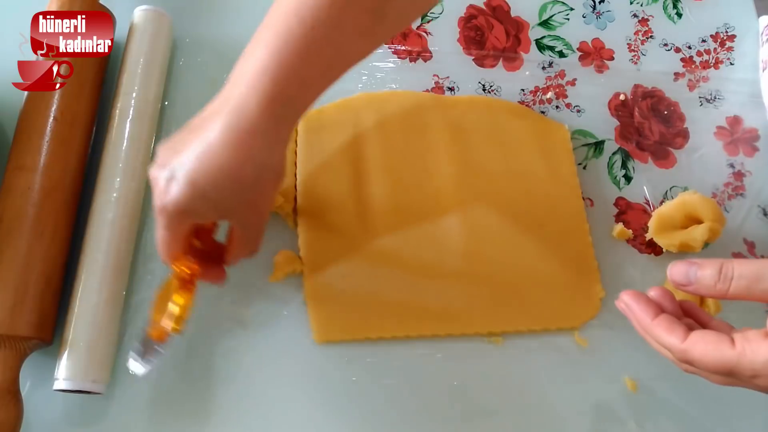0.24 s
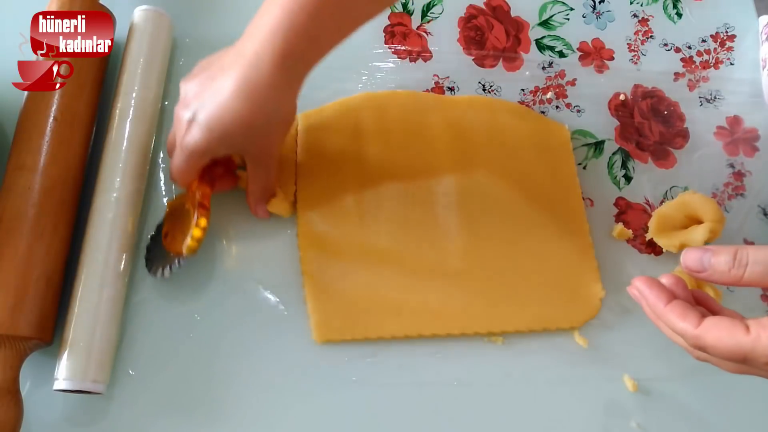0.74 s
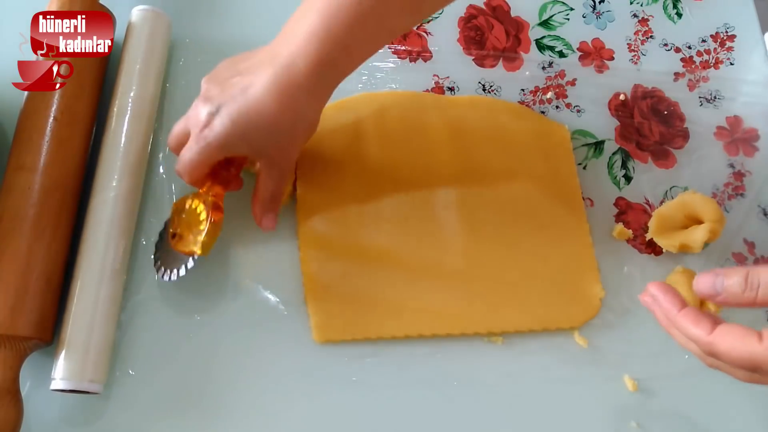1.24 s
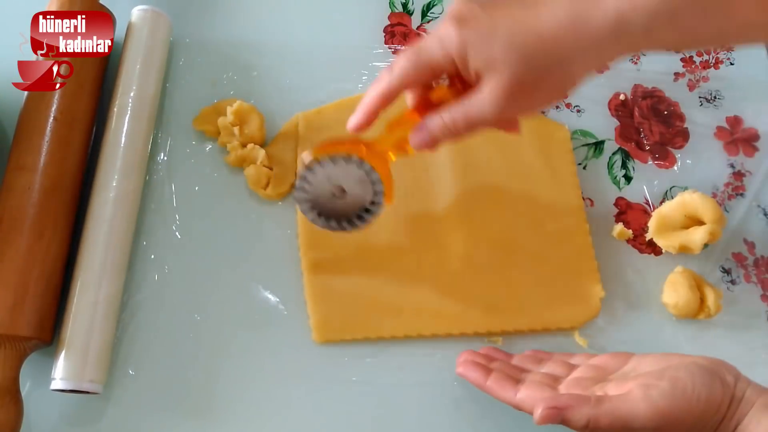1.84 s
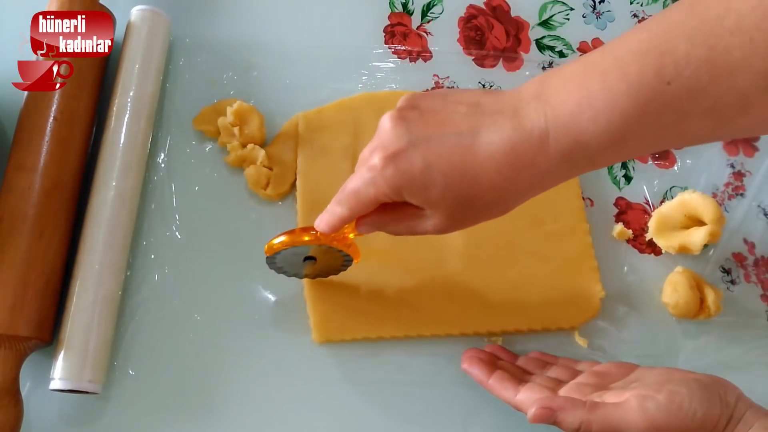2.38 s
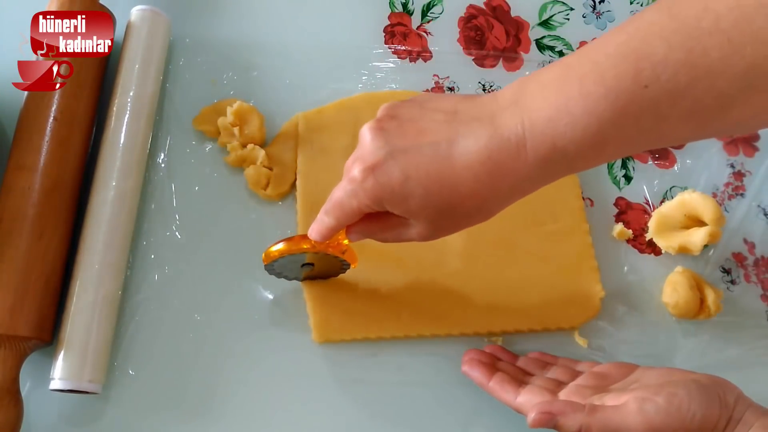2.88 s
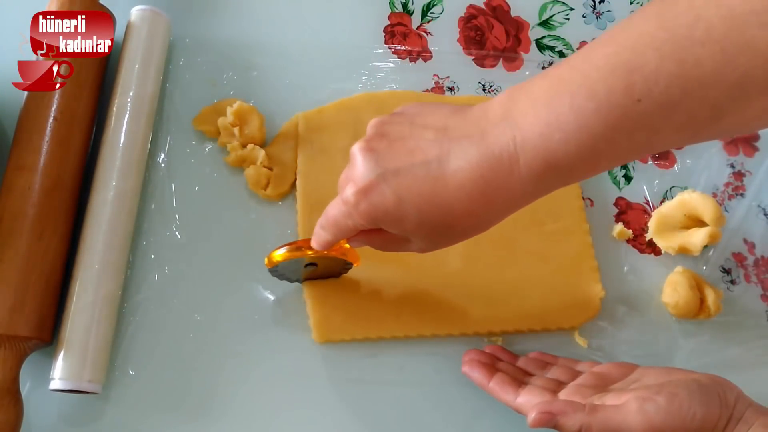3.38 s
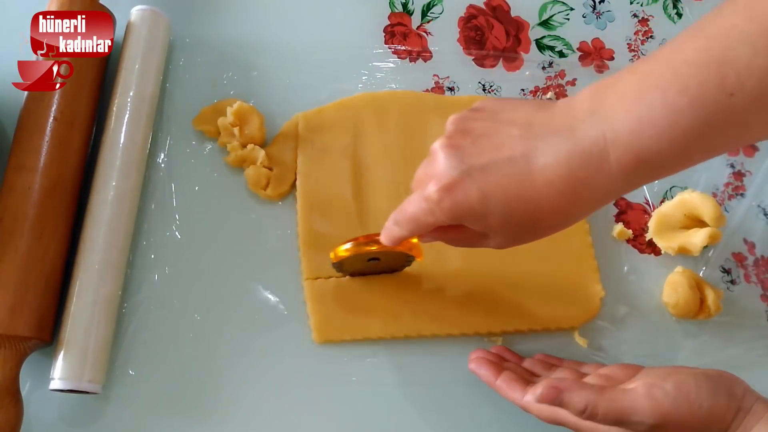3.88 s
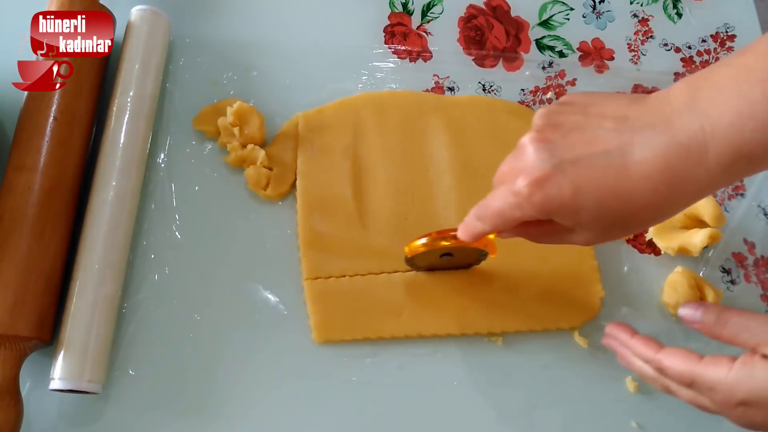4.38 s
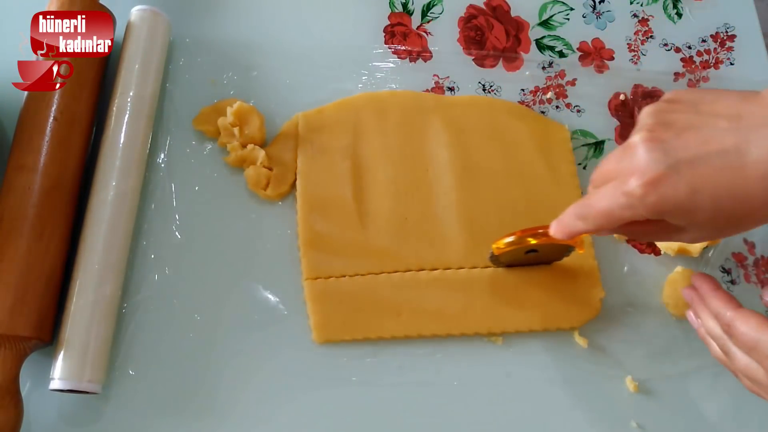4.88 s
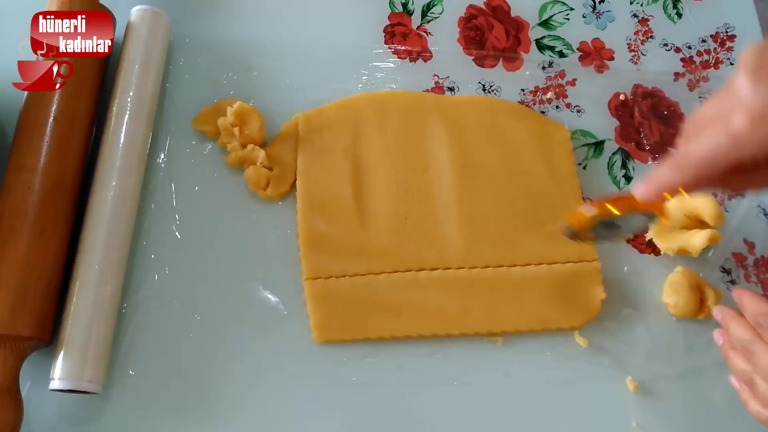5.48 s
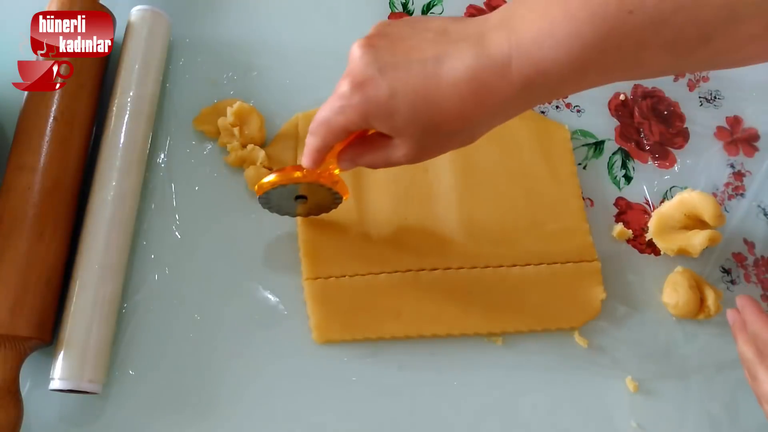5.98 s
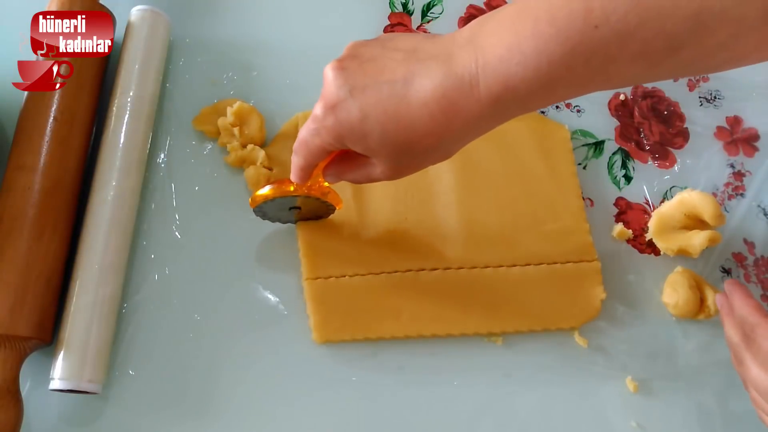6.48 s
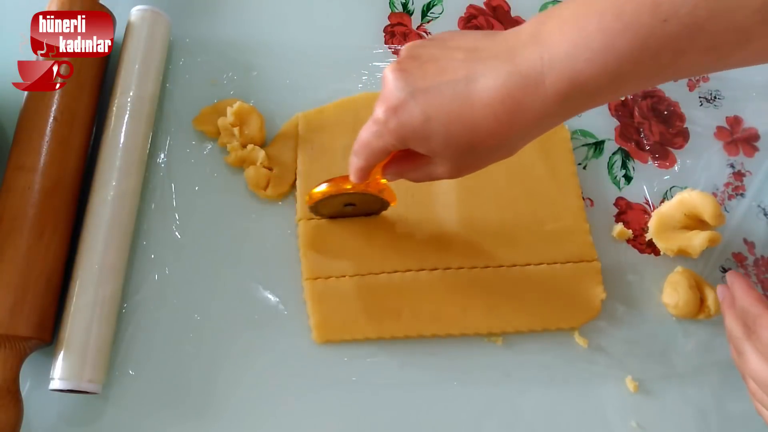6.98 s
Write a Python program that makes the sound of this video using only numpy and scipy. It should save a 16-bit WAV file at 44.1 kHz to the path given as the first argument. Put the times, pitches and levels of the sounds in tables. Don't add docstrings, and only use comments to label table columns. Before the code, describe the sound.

Sharp metallic knocks and ringing rattles on glass, low table thumps, then a soft gritty rolling scrape that swells and stops with a light clink.

```python
import sys
import numpy as np
from scipy import signal
from scipy.fft import rfft, irfft, next_fast_len
from scipy.io import wavfile
from scipy.ndimage import uniform_filter1d, map_coordinates

SR = 44100
rng = np.random.default_rng(int(sys.argv[2]) if len(sys.argv) > 2 else 0)


def makeup_ratio(level_db):
    decades = np.asarray(level_db, float) / 20
    return 10 ** decades


def unload_audio(sound):
    columns = np.transpose(np.atleast_2d(sound))
    steps = np.round(np.clip(columns, -1, 1) * 32767)
    wavfile.write(sys.argv[1], SR, steps.astype(np.int16))


N = 319284
LEFT_RIGHT = np.array([[1], [-1]])


def level(x, db):
    return x * makeup_ratio(db) / np.sqrt(np.mean(x ** 2))


def peak(x, db):
    return x * makeup_ratio(db) / np.abs(x).max()


def band(x, hz, width):
    return signal.lfilter(*signal.iirpeak(min(hz, .45 * SR), hz / width, SR), x)


def double_band(x, hz, width, second_width):
    return band(band(x, hz, width), hz, second_width)


def shape(x, points, share=0.93):
    hz, db = np.transpose(points)
    size = next_fast_len(x.shape[-1])
    f = np.maximum(np.arange(size // 2 + 1) * SR / size, 1)
    gain = makeup_ratio(share * np.interp(np.log(f), np.log(hz), db))
    return irfft(rfft(x, size) * gain, size)[..., :x.shape[-1]]


def curve(rows):
    s, *columns = np.transpose(rows)
    return [np.interp(np.arange(N) / SR, s, c) for c in columns]


def walk(rate):
    k = int(SR / rate)
    steps = np.repeat(rng.standard_normal(N // k + 1), k)
    return 1.2 * uniform_filter1d(uniform_filter1d(steps, k), k)[:N]


def ring(t, hz, t60, phase):
    return np.sin(2 * np.pi * (hz * t + phase)) * np.exp(-np.log(1000) * t / t60)


def add(out, sound, s):
    i = int(s * SR)
    out[i:i + len(sound)] += sound[:N - i]


# pitch_hz, level_db (per Hz)
AIR = [(13, -27), (22, -2.5), (44, -7), (311, -19), (853, -25), (1880, -28), (5460, -33.5), (14000, -33.5)]


def air():
    mid, side = shape(rng.standard_normal((2, N)), AIR)
    side = shape(side, [(60, -2.5), (500, 2.0), (3000, -0.5), (12000, 0)])
    return level(mid + side * LEFT_RIGHT, -66.5) * makeup_ratio(0.27 * walk(3.5) + 1.5 * LEFT_RIGHT)


def loads(rest_db, rows):
    t, power = np.arange(0, N, 50) / SR, makeup_ratio(rest_db[::50]) ** 2
    for s, db, hold in rows:
        landing = 1506.5 * (s - t)
        settling = 159.5 * (t - s - hold)
        power = power + makeup_ratio(db - np.clip(np.maximum(landing, settling), 0, 100)) ** 2
    return np.interp(np.arange(N) / SR, t, 10 * np.log10(power))


# pitch_hz, width_hz
TABLE = [(66, 25), (110, 16), (130, 20), (175, 60), (230, 70), (290, 60), (370, 70), (720, 450)]
# start_s, low_boom_db, upper_boom_db, hold_s
BOOMS = [(0.0, -48, -46.5, 0.022), (0.393, -51.5, -45, 0.11), (0.52, -50, -64, 0.17),
         (0.916, -83, -72, .02), (1.12, -78, -50.5, .04), (1.489, -56, -63, .04), (1.956, -58, -64.5, .04),
         (2.356, -74, -74, 0.033), (2.822, -62, -85, 0.025), (3.167, -67.5, -75, .03),
         (3.525, -64.5, -68, 0.03), (3.703, -80, -71.5, 0.059), (4.09, -62, -66.5, 0.081),
         (4.534, -76, -56.5, 0.017), (5.144, -68, -68, 0.023), (5.431, -58, -58, 0.039),
         (6.567, -72, -70.5, 0.021), (6.937, -77, -61, 0.028), (7.085, -58.5, -62.5, 0.032)]
# start_s, level_db, hold_s
CREAKS = [(0.0, -39, 0.011), (0.385, -72, 0.02), (0.633, -48.5, 0.018), (0.854, -59, 0.023),
          (1.119, -53.5, 0.037), (1.5, -52.5, 0.04), (1.697, -67.5, 0.089), (1.96, -64, 0.017),
          (2.068, -65, 0.34), (3.696, -69, 0.055), (4.096, -70, 0.026), (4.478, -64.5, 0.43),
          (5.167, -72, 0.034), (5.413, -66, 0.24), (6.455, -68.5, 0.4), (7.046, -66, 0.05)]
# time_s, level_db
WEIGHT = [
    (0, -64),
    (1.3, -68),
    (2.1, -72),
    (3.3, -75),
    (3.7, -66),
    (4.9, -68.5),
    (5.3, -74.5),
    (5.6, -68),
    (6.3, -71.5),
    (7.24, -65.5),
]


def table():
    rest_db = curve(WEIGHT)[0] + walk(7.7)
    low_db = loads(rest_db, [(s, db, hold) for s, db, _, hold in BOOMS])
    upper_db = loads(rest_db - 6.5, [(s, db, hold) for s, _, db, hold in BOOMS])
    creak_db = loads(rest_db - 4.5, CREAKS)
    levels_db = [low_db, upper_db - 2.5, upper_db - 1.5, upper_db - 12.0,
                 creak_db - 9.0, creak_db - 13.0, creak_db - 8.0, creak_db - 12.5]
    out = 0
    for (hz, width), db in zip(TABLE, levels_db):
        mid, side = (level(double_band(rng.standard_normal(N), hz, width, 2 * width), 0) for _ in range(2))
        out = out + makeup_ratio(db) * (mid + .28 * side * LEFT_RIGHT)
    return out * makeup_ratio(np.array([[2.5], [-2.8]]))


# pitch_hz, width_hz, level_db
GUARD = [(1900, 1100, -9), (2970, 1700, -10.5), (3280, 1100, -10.5), (4430, 100, 1.5), (4840, 100, -3.5),
         (6030, 4600, -3), (6700, 3000, -10.5), (8050, 2700, -4.5)]
# start_s, peak_db, guard_pitch_hz, bright_crack_db, contact_ms
CLACKS = [(0.0044, -11, 4730, -4.5, 4), (0.0136, -13, 4596, -8.5, 6.3), (0.0321, -11.5, 4500, -1.5, 1.9),
          (1.2891, -25.5, 4650, -23, 1.7), (1.292, -30.5, 3950, -31, 0.91), (1.2975, -35.5, 6700, -26, 1.9),
          (1.299, -43, 4100, -24, 4), (1.5009, -21.5, 4570, -10, 2.4), (1.5048, -7.5, 4840, -11.5, 3.6),
          (1.5075, -15.5, 2950, -24, 2.6), (1.511, -15, 10300, -12.5, 4.6), (1.5095, -11.5, 4600, -7, 1.4),
          (1.7437, -30, 4160, -19, 4.4), (1.7471, -22.5, 4460, -16.5, 8.4), (1.752, -27, 5500, -20.5, 5.8),
          (1.8284, -29, 4880, -12.5, 4), (1.8614, -37, 3075, -24, 3), (1.884, -31.5, 5900, -27, 3.2),
          (1.932, -36.5, 4880, -11.5, 4.4), (1.9786, -9.5, 4900, -13, 2.8), (1.9782, -7.5, 6650, -21, 3.2),
          (1.997, -28.5, 6700, -24.5, 6.5), (2.04, -31.5, 5200, -25, 14), (1.52, -29, 5580, -22, 5.8),
          (1.981, -23, 10500, -14, 4), (1.986, -23, 5900, -22, 4.2), (2.0204, -21.5, 4570, -14.5, 1.1),
          (2.1005, -32, 5400, -38, 3), (5.555, -36, 4760, -18, 4), (5.564, -32.5, 4930, -13, 4.3),
          (5.5715, -24.5, 4940, -13, 1.1), (5.5945, -28, 4800, -21, 1), (5.7681, -29.5, 5300, -15, 1.8),
          (5.787, -43.5, 4500, -29, 8), (5.769, -39, 10600, -27, 1.3), (5.772, -38, 7000, -27, 2.5)]
# start_s, peak_db,
# guard_pitch_hz, table_thud_db, contact_ms
NUDGES = [(0.026, -10, 2906, -8, 3.56), (0.506, -36.5, 4830, -51, 3.4), (0.632, -35, 2720, -1, 4.1),
          (0.687, -33, 4560, 2, 3.8), (0.7668, -39.5, 4200, -3, 3.2), (0.8489, -46, 2900, -6, 10),
          (0.867, -40, 4150, -7.5, 5.7), (0.97, -40.5, 4600, -16, 1.3), (0.9973, -48, 4430, -11, 2.8),
          (1.034, -48, 4567, -10.5, 3.2), (1.1033, -44.5, 9600, -20, 3), (1.1162, -43, 4000, -26.5, 2.2),
          (1.1273, -32.5, 4430, -6.5, 3), (1.13, -34, 2600, -7, 7), (1.141, -39, 4570, -4, 8.8),
          (1.1571, -40, 2550, -2.5, 5.7), (1.1933, -35.5, 5160, -21, 4.5), (1.9797, -36, 4400, 3.5, 2.2),
          (1.505, -30.5, 2887, 2.5, 4.6), (0.0289, -17, 9800, -21, 3.5), (6.5594, -58, 2970, 16, 2.8)]
# start_s, peak_db, guard_pitch_hz, bright_crack_db
TICKS = [(0.1465, -33.5, 4430, -36), (2.2298, -45.5, 4630, -19), (2.6394, -64.5, 4330, -15),
         (2.6798, -56, 5370, -17.5), (2.7218, -56, 4650, -23), (2.7828, -35.5, 5520, -33),
         (2.786, -59, 4900, -33), (2.785, -43, 3300, -22), (3.164, -36, 6650, -9.5),
         (5.768, -45, 3600, -29), (6.2474, -42, 4300, -17), (3.163, -38, 4800, -25),
         (4.0953, -41.5, 4900, 17.5), (0.45, -63, 4360, -19), (5.5462, -48, 4940, -22),
         (5.7085, -46, 4400, 8), (5.9187, -37.5, 4540, -29), (6.1898, -46.5, 4550, -30),
         (6.2502, -40.5, 4240, -17), (6.8013, -47.5, 4800, -7.5), (7.0603, -41.5, 5670, 2.5)]


def knocks():
    out, t = np.zeros(N), np.arange(SR // 10) / SR
    # start, peak dB, guard Hz, thud dB, crack dB, contact ms
    blows = [(s, db, hz, -18.5, crack_db, ms) for s, db, hz, crack_db, ms in CLACKS]
    blows += [(s, db, hz, thud_db, -11.5, ms) for s, db, hz, thud_db, ms in NUDGES]
    blows += [(s, db, hz, -21, crack_db, 1.8) for s, db, hz, crack_db in TICKS]
    for s, db, hz, thud_db, crack_db, ms in blows:
        span = max(ms, .3) / 1000
        chatter = rng.standard_normal(len(t)) * (1 - np.exp(-t / (.45 * span))) * np.exp(-t / span)
        guard = double_band(chatter, hz, 1100, 1400)
        for guard_hz, width, guard_db in GUARD:
            part = double_band(chatter, guard_hz, width, 2 * width)
            guard = guard + makeup_ratio(guard_db + 0.24 * db - 5.5) * part
        crack = band(chatter, 9800, 16000)
        thud = double_band(chatter, 970, 2300, 2300)
        blow = peak(guard, 0) + peak(crack, crack_db + 9.5) + peak(thud, thud_db + 1.5)
        add(out, peak(blow, db - 2.5), s - .001)
    return out * makeup_ratio(2.0 * walk(40))


# pitch_hz, level_db, t60_s (time to fade by 60 dB)
WHEEL = [(2934, -12, .14), (3185, -13, .2), (3225, -13, .16), (5660, -3, .22), (5705, -6, .2),
         (8750, -1, .11), (8810, -5, .16), (4470, -15, .12), (6700, -14, .09), (9600, -16, .08),
         (10450, -9, .07), (12380, -2, .11), (12440, -7, .13), (13780, -2, .08)]
# start_s, then level_db of the 3.2, 5.7, 8.8 and 12.4 kHz families
RINGS = [(0.0044, -20, -41, -19.5, -26.5), (0.0327, -38.5, -44.5, -34.5, -39), (0.509, -48, -52, -56, -75),
         (0.6339, -50, -51, -43.5, -54), (0.684, -48, -56, -62, -61), (0.8678, -53, -77, -55, -62),
         (1.1171, -50.5, -51.5, -73, -64), (1.194, -72, -58, -49.5, -67), (1.289, -54.5, -52, -53.5, -59),
         (1.503, -43.5, -34, -28, -33), (1.7454, -37, -40, -39.5, -44.5),
         (1.8305, -53.5, -57, -54.5, -56.5), (1.8823, -53.5, -55, -69.5, -72),
         (1.9795, -39, -35, -24.5, -28.5), (5.552, -67, -76, -59, -68), (5.572, -40, -77.5, -63, -63)]


def rings():
    out, t = np.zeros(N), np.arange(SR // 3) / SR
    for s, *family_db in RINGS:
        for hz, db, t60 in WHEEL:
            blow_db = np.interp(hz, [3200, 5700, 8800, 12400], family_db)
            gain = makeup_ratio(db + blow_db) * (1 - np.exp(-t / 0.00062))
            detuned_hz = hz * (1 + 0.0013 * rng.standard_normal())
            add(out, gain * ring(t, detuned_hz, t60, rng.random()), s)
    return out


# start_s, pitch_hz, level_db, t60_s, swell_s
CLINKS = [(.505, 964, -66, 1.0, .03), (.505, 1760, -57, .15, .004), (.505, 2550, -60, .25, .004),
          (1.29, 1000, -68, 2.0, .05), (1.75, 2191, -64, 1.0, .01), (1.985, 2190.0, -55, 3.5, .02),
          (1.985, 2191.0, -56, 3.5, .02), (1.98, 3757, -61, 1.1, .03), (1.98, 3761.3, -62, 1.2, .02),
          (2.04, 10603, -64, .8, .01), (2.04, 10610, -66, .8, .01), (.688, 10600, -66, .3, .005),
          (1.29, 5690, -65, .4, .04), (1.29, 5702, -67, .4, .04), (1.98, 3200, -42, .3, .06)]
# start_s, pitch_hz, level_db, t60_s, swell_s
RATTLES = [(6.248, 2150, -54, .03, .001), (1.505, 10600, -41, .12, .002), (5.565, 3300, -52, .12, .004),
           (1.98, 4430, -35, .3, .004), (1.98, 4576, -38, .3, .004), (1.98, 4675, -38, .2, .003),
           (1.98, 4840, -35, .25, .003), (1.98, 5168, -37, .1, .002), (1.506, 4834, -33, .2, .003),
           (1.506, 5157, -39, .25, .004), (1.506, 4675, -36, .18, .003), (1.3, 4150, -55, .2, .015),
           (1.3, 4290, -58, .15, .015), (.03, 4829, -38, .25, .004), (.03, 4355, -38, .25, .004),
           (1.98, 6701, -32, .16, .003), (1.98, 5713, -38, .35, .006), (1.98, 7070, -38, .12, .003),
           (1.506, 2935, -31, .12, .003), (1.506, 4436, -35, .3, .004), (1.747, 4480, -42, .2, .004),
           (1.747, 6700, -46, .12, .004), (.507, 5700, -53, .45, .003), (1.195, 5700, -56, .4, .004),
           (.005, 4615, -35, .2, .003), (.633, 10600, -62, .3, .004)]


def clinks():
    t = np.arange(int(.72 * SR)) / SR
    grip = np.minimum(1, (t[-1] - t) / .1)
    steady, loose = np.zeros((2, N))
    for out, rows in ((steady, CLINKS), (loose, RATTLES)):
        for s, hz, db, t60, swell in rows:
            add(out, makeup_ratio(db) * (1 - np.exp(-t / swell)) * grip * ring(t, hz, t60, 0), s)
    return steady + loose * makeup_ratio(1.5 * walk(35.38))


# pitch_hz, width_hz, depth (0 to 1)
DIPS = [(3760, 1100, 0.1), (7630, 440, .6), (9800, 1400, 0.1), (6150, 300, .3)]


def bounce(x):
    for hz, width, depth in DIPS:
        x = x - depth * band(x, hz, width)
    return x


# pitch_hz, t60_s, level_db
ECHO = [(250.4, 0.26, -19.5), (600, 0.26, -1.5), (1500, 0.19, 2), (2250, 0.41, -5), (3200, 0.27, -2),
        (5400, 0.2, -7.5), (8400, 0.15, -2), (12000, 0.051, -10.5)]


def kitchen(near):
    t = np.arange(SR // 2) / SR
    echo = 0
    for hz, t60, db in ECHO:
        noise = band(rng.standard_normal((2, len(t))), hz, 1.3 * hz)
        echo = echo + makeup_ratio(db) * noise * np.exp(-np.log(1000) * t / t60)
    late_walls = 0.53 + 0.28 / (1 + np.exp((.015 - t) / 0.015))
    echo = echo * late_walls * (1 - np.exp(-t / .002))
    return makeup_ratio(-28.0) * signal.fftconvolve(near[None], echo, axes=1)[:, :N]


# time_s, level_db
SWEEP = [(0.6, -79), (0.682, -62.5), (0.806, -73), (0.986, -77.5), (1.18, -73), (1.28, -80)]
CARRY = [(2.2, -78), (2.31, -74.5), (2.45, -91)]
ROLL = [(3.35, -84), (3.64, -71.5), (3.84, -66.5), (3.93, -65), (4.46, -68.5), (4.75, -66), (5.05, -64.5),
        (5.2, -64.5), (5.36, -54.5), (5.45, -62), (5.49, -68)]
LIFT = [(5.52, -70), (5.555, -48.5)]
RESTART = [(6.85, -100), (7.0, -82.5), (7.24, -77.5)]
# pressure (one of the above), airy_db, dull_db
RUBS = [
    (SWEEP, 7.1, 7),
    (CARRY, 3.8, -2),
    (ROLL, -0.8, -8.5),
    (LIFT, 1.89, -4.5),
    (RESTART, 1, -2.8),
]
# pitch_hz, width_hz, level_db
RUB_BODY = [(2330, 70, -6), (4430, 120, -9.5), (4940, 50, 5), (5150, 120, 4.5), (5460, 150, -8),
            (6900, 120, -16), (7960, 1100, -9.5), (11100, 230, -34), (12900, 120, -8.5)]
# time_s, extra_db
TEETH = [(3.48, 16.5), (3.62, 6.5), (3.739, 6.5), (3.837, 6.5), (3.95, 8), (4.04, 5.5), (4.105, 8.5),
         (4.147, 12), (4.24, 7.5), (4.32, 5.5), (4.41, 6.5), (4.5, 4), (4.619, 7), (4.7, 7), (4.781, 5),
         (4.85, 8), (4.92, 4.5), (5.0, 6.5), (5.1, 1.5), (5.18, 5.5), (5.26, 6.5), (5.32, 1.5), (5.375, 3),
         (5.435, 3)]
# time_s, pitch_hz
RIM = [(3.45, 4993), (4.07, 4976), (4.12, 4840), (4.17, 5075), (4.81, 5037), (4.9, 5170), (5.0, 4925),
       (5.32, 5135), (5.5, 4937)]


def rubbing():
    rows = []
    for part, airy, dull in RUBS:
        fade_in, fade_out = (part[0][0] - .015, -100), (part[-1][0] + .015, -100)
        rows += [(s, db, airy, dull) for s, db in [fade_in, *part, fade_out]]
    body_db, airy_db, dull_db = curve(rows)
    airy_db = airy_db - 0.39 * (body_db + 64.5)
    t = np.arange(N) / SR
    bite_db = sum(db * np.exp(-((t - s) / .017) ** 2) for s, db in TEETH) - 6.5
    grains = []
    for _ in range(3):
        noise = rng.standard_normal(N)
        grain_db = 1.8 * rng.exponential(size=N) + 3.2 * walk(60)
        grains.append(noise * makeup_ratio(grain_db))
    body = 0
    for hz, width, db in RUB_BODY:
        body = body + makeup_ratio(db + 2.0 * walk(7.8)) * double_band(grains[0], hz, 0.83 * width, 5 * width)
    warp = np.cumsum(curve(RIM)[0] / 5040 * (1 + 0.012 * walk(25)))
    body = level(map_coordinates(body, [warp], mode="mirror"), 0)
    airy = band(band(grains[1], 7000, 14000), 5200, 10000)
    airy = level(airy + 1.3 * band(airy, 8700, 2000), airy_db)
    dull = double_band(grains[2], 2300, 1400, 1800)
    dull = level(dull, dull_db)
    drag = level(double_band(grains[2], 1039, 1400, 1400), -14 + 0.623 * (body_db + 69.0))
    return makeup_ratio(body_db + bite_db) * (body + makeup_ratio(-0.5 * bite_db) * airy + dull + drag)


# start_s, peak_db, pitch_hz
GRIT = [(3.476, -64, 4920), (3.4995, -62.5, 5110), (3.594, -55, 4890), (3.6294, -54, 4880),
        (3.7112, -63, 4910), (3.726, -48, 5000), (3.737, -52, 4780), (3.7781, -65, 4970),
        (3.8095, -53, 5210), (3.8434, -48, 5110), (3.8434, -54, 4950), (3.9222, -64, 4960),
        (3.9347, -66, 4600), (3.9347, -50, 5000), (3.9422, -52, 4970), (4.0185, -48, 4920),
        (4.04, -54, 4930), (4.0963, -51, 4840), (4.131, -52, 4620), (4.146, -57, 5120), (4.2335, -51, 5030),
        (4.3368, -62, 5180), (4.4156, -61, 5120), (4.4286, -61, 5100), (4.4949, -66, 4800),
        (4.5363, -65, 5010), (4.582, -66, 5000), (4.6047, -57, 5100), (4.6261, -59, 5060),
        (4.6825, -59, 5180), (4.691, -60, 5190), (4.7134, -49, 5090), (4.7763, -61, 4640),
        (4.7898, -61, 5260), (4.8297, -55, 5170), (4.8367, -62, 5110), (4.8651, -51, 5150),
        (4.903, -63, 5140), (4.923, -52, 5260), (4.9474, -50, 4900), (4.9973, -51, 4970),
        (5.0951, -54, 4930), (5.1245, -59, 4900), (5.1579, -63, 5180), (5.1579, -57, 5080),
        (5.1789, -48, 4960), (5.2108, -63, 4880), (5.2293, -56, 5140), (5.2422, -59, 5090),
        (5.2422, -52, 5200), (5.2572, -46, 5200), (5.2966, -43, 5070), (5.3156, -43, 5100),
        (5.337, -44, 5090), (5.3535, -42, 5030), (5.3729, -41, 5100), (5.4218, -49, 4940),
        (5.4333, -42, 4900)]


def grit():
    out, t = np.zeros(N), np.arange(SR // 40) / SR
    for s, db, hz in GRIT:
        burst = rng.standard_normal(len(t)) * np.exp(-t * 1000 / 4.5)
        snap = double_band(burst, hz, 480, 790) + makeup_ratio(-31.0) * band(burst, 9700, 6000)
        add(out, peak(snap, db - 5), s - .001)
    return out


# pitch_hz, tilt_db (positive favours the left
PORTS = [(60, 1), (200, -0.5), (380, 6.5), (1290, 3), (2380, 8), (4400, 9), (8120, -5.5), (15000, -9)]


def scene():
    rub = bounce(rubbing() + grit())
    hits = bounce(knocks()) + rings()
    direct = hits + clinks() + rub
    left, right = shape(direct, PORTS, share=0.73), shape(direct, PORTS, share=-0.97)
    left = np.roll(left, 8)
    return np.array([left, right]) + kitchen(hits + rub) + table() + air()


def roll_off(x):
    return signal.sosfilt(signal.butter(12, 16810, fs=SR, output="sos"), x)


def record(dry):
    mix = shape(dry, [(20, -13.5), (40, -4.0), (14200, 0.5), (14900, -11.5), (16800, -50.5)])
    return roll_off(mix)


dry = scene()
out = record(dry)
unload_audio(out)
```